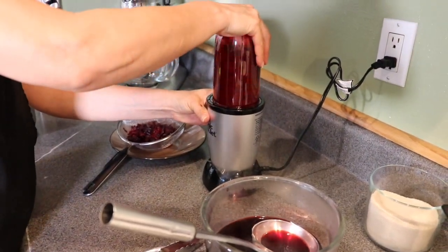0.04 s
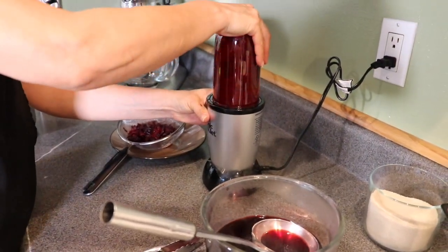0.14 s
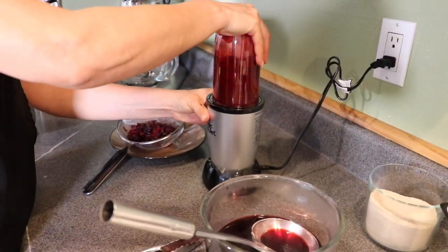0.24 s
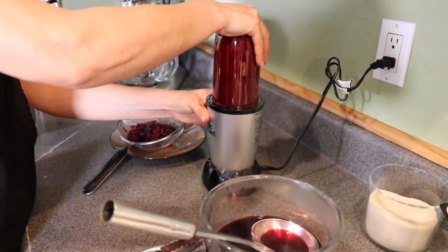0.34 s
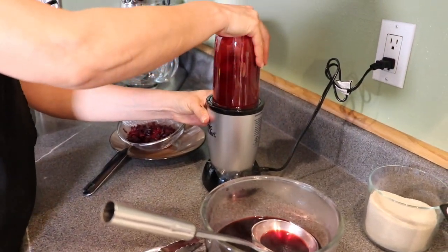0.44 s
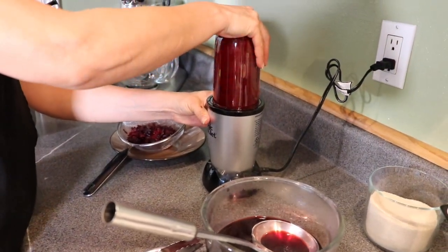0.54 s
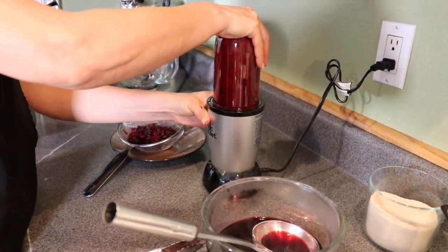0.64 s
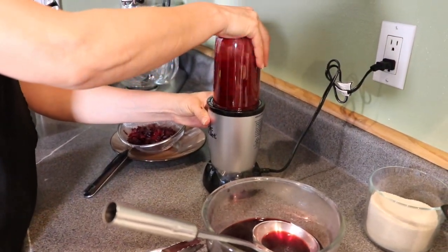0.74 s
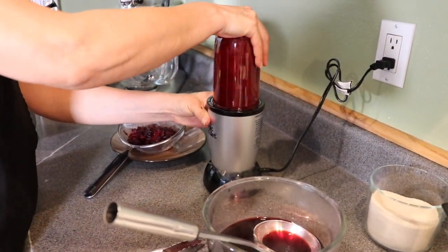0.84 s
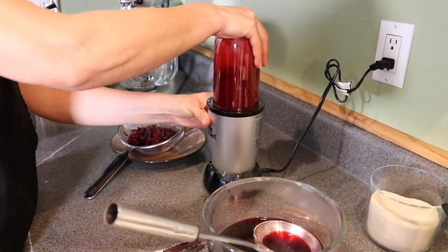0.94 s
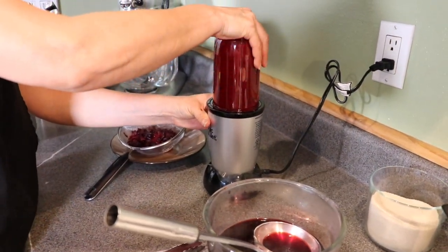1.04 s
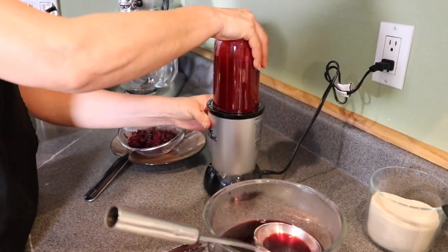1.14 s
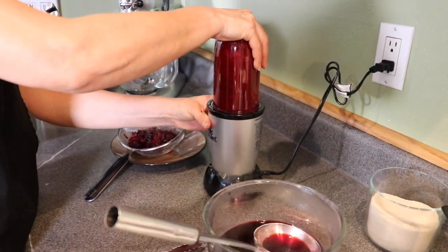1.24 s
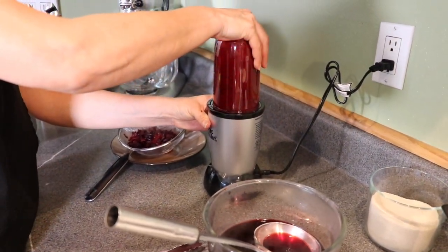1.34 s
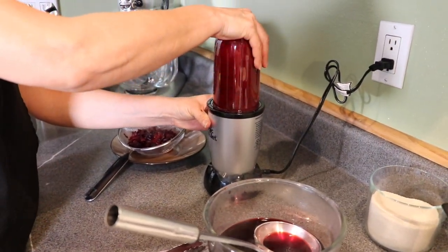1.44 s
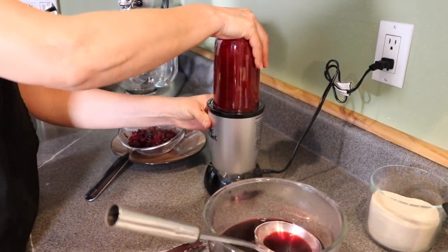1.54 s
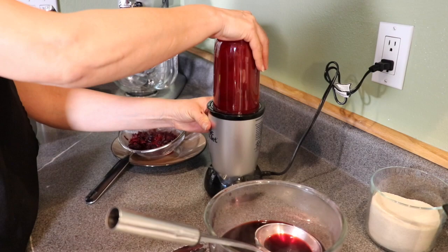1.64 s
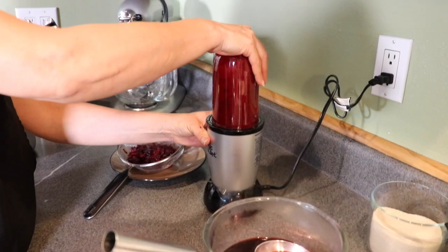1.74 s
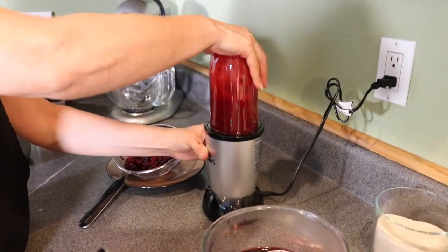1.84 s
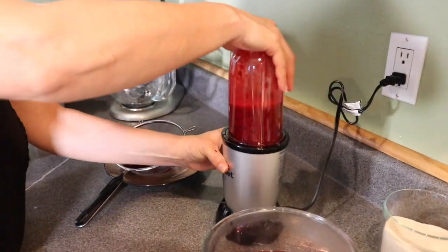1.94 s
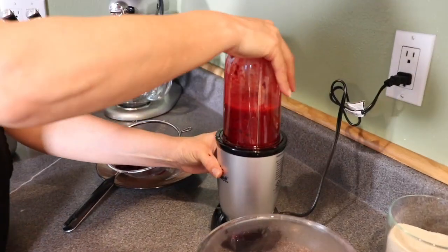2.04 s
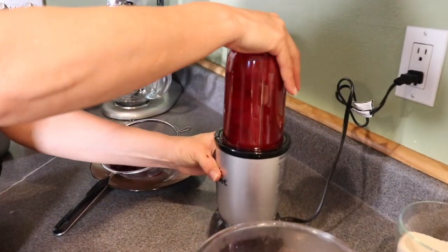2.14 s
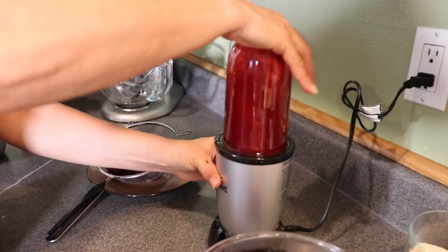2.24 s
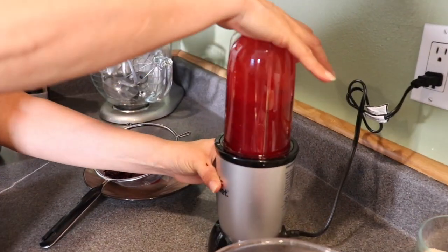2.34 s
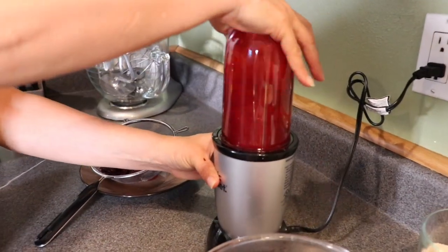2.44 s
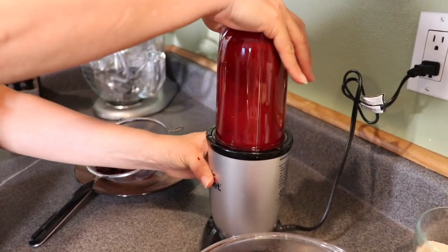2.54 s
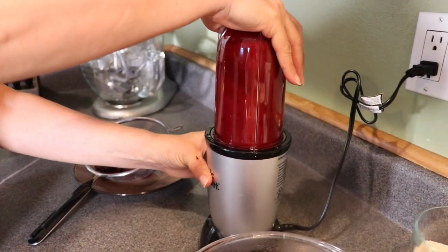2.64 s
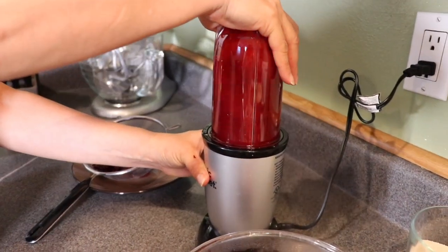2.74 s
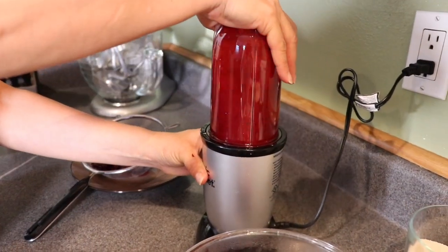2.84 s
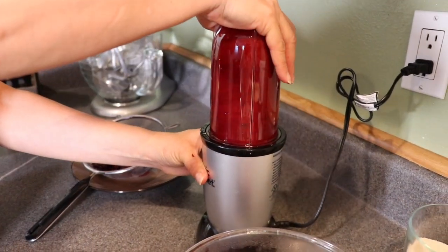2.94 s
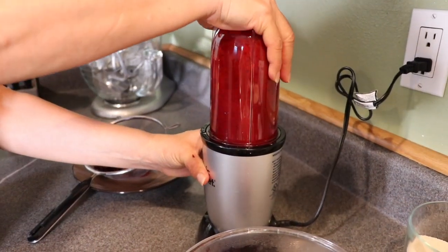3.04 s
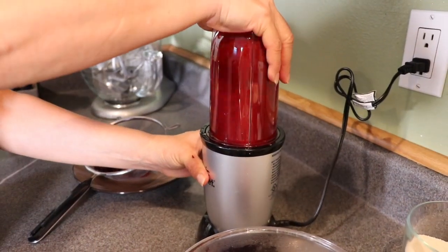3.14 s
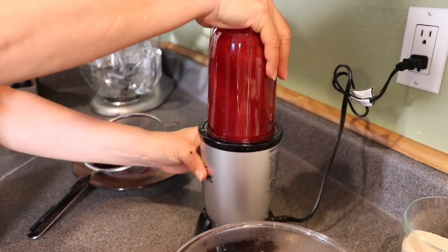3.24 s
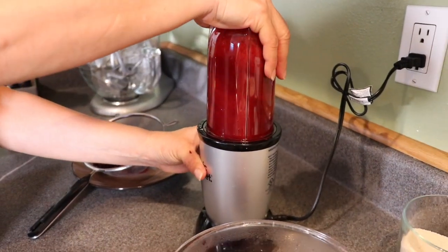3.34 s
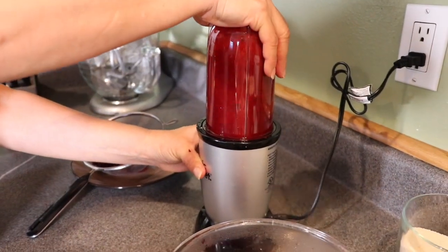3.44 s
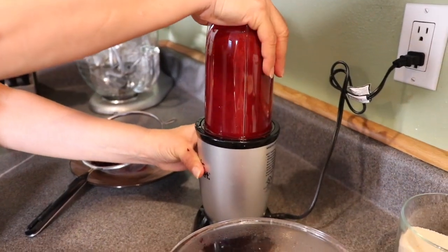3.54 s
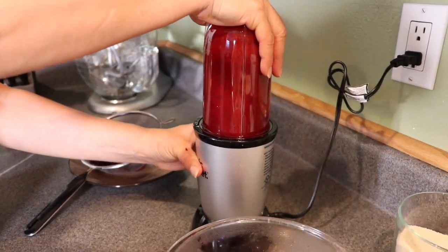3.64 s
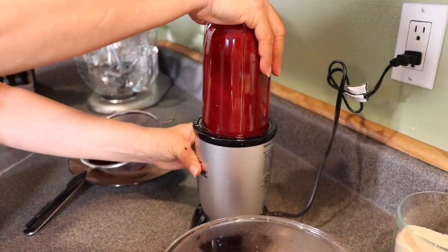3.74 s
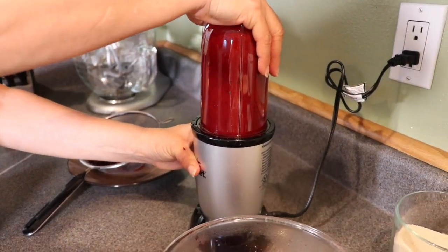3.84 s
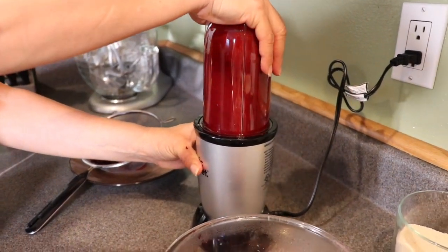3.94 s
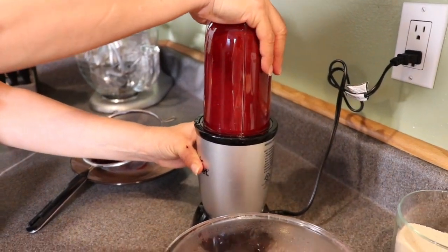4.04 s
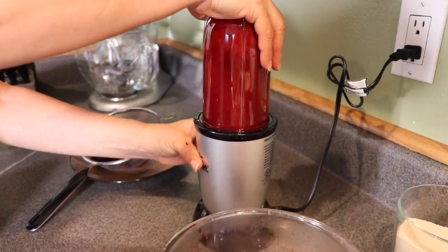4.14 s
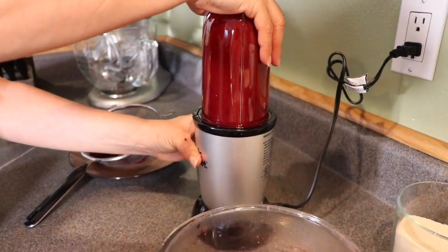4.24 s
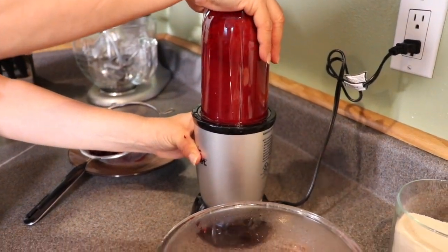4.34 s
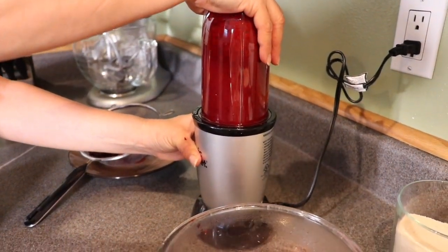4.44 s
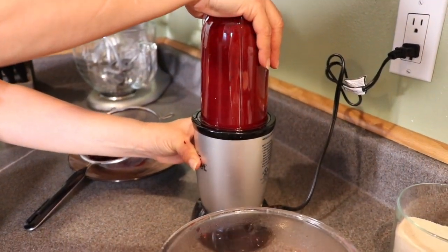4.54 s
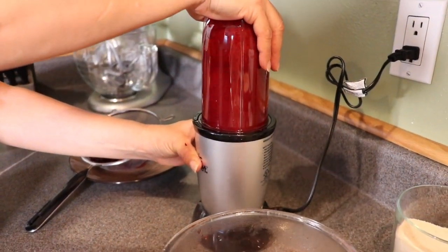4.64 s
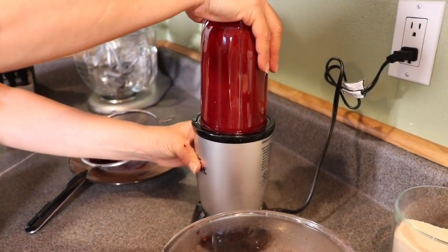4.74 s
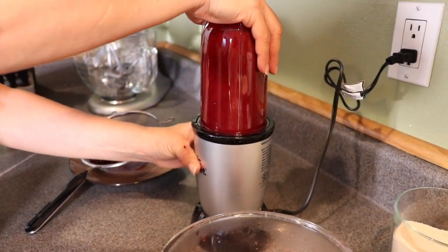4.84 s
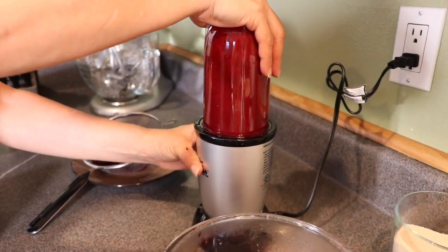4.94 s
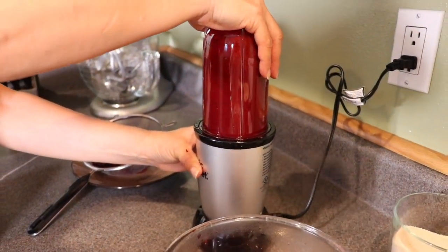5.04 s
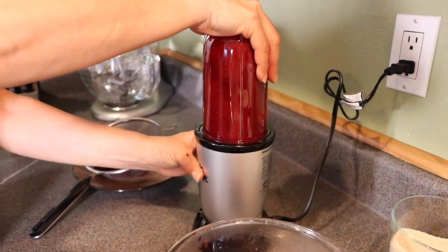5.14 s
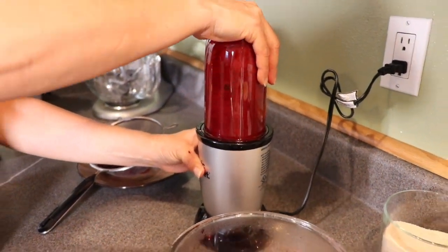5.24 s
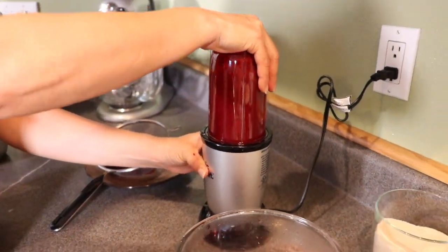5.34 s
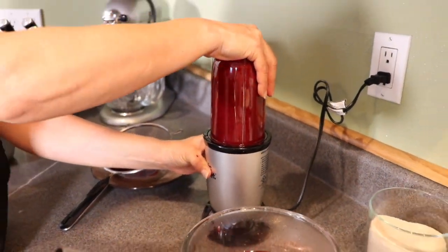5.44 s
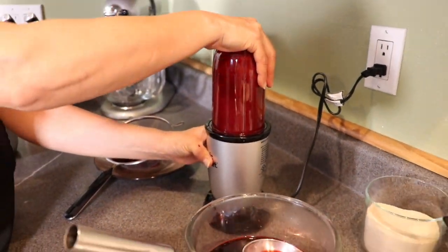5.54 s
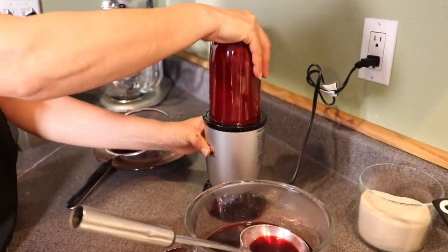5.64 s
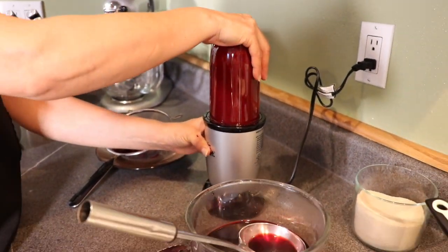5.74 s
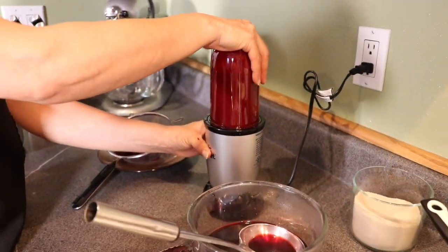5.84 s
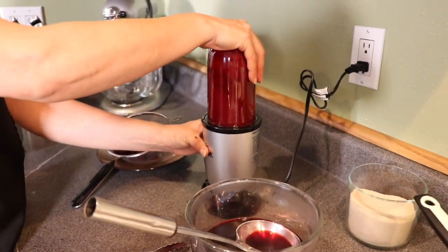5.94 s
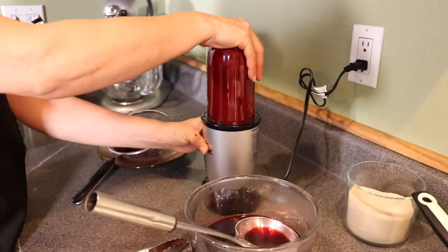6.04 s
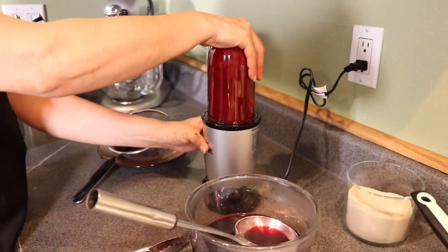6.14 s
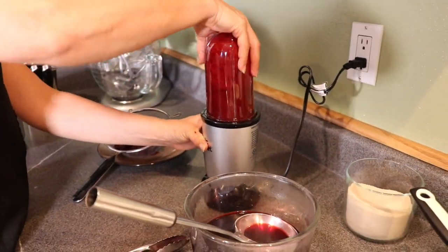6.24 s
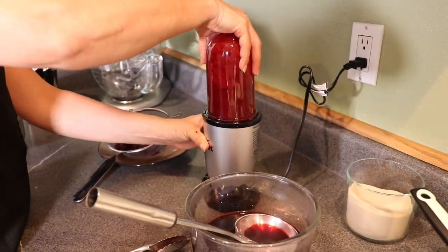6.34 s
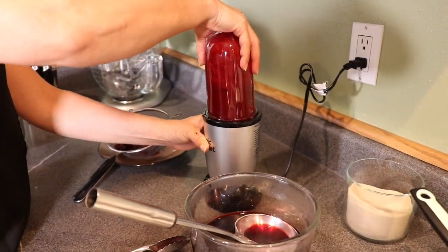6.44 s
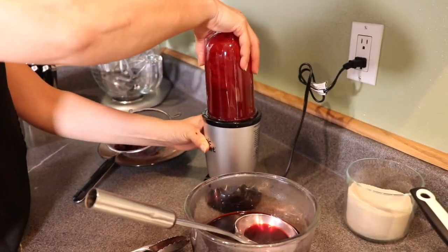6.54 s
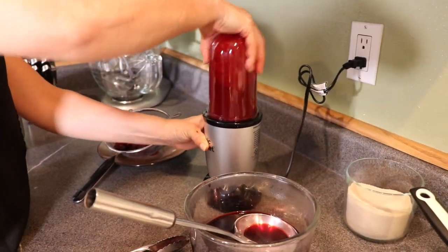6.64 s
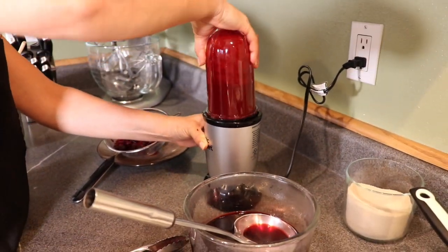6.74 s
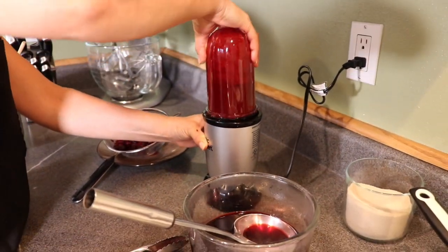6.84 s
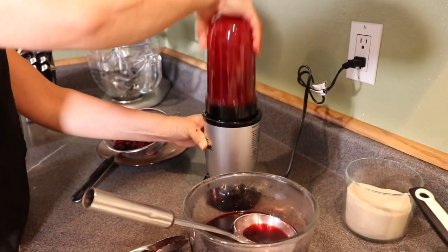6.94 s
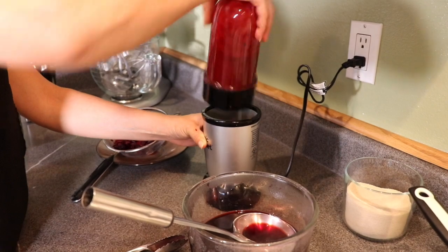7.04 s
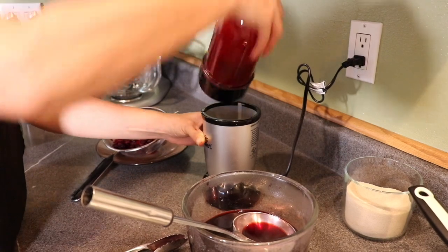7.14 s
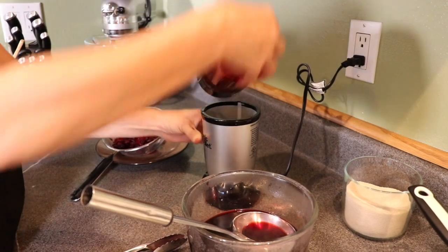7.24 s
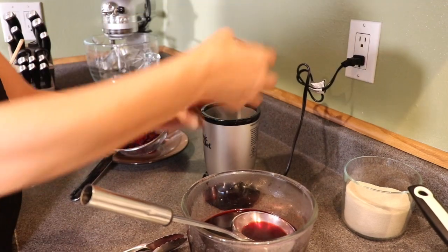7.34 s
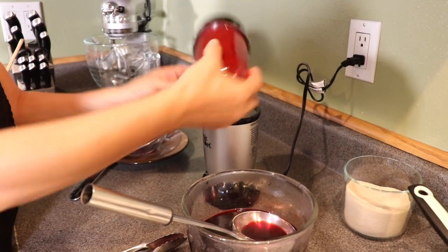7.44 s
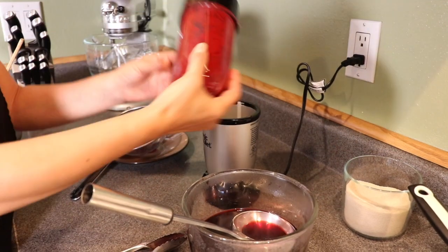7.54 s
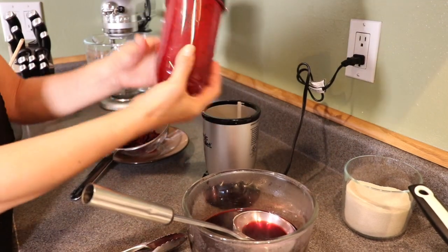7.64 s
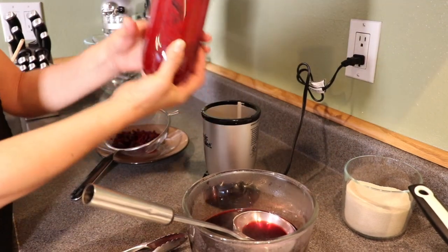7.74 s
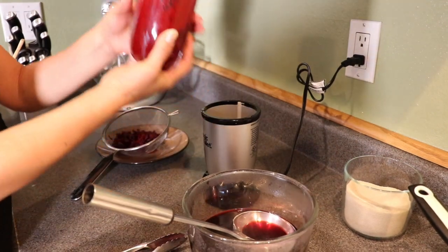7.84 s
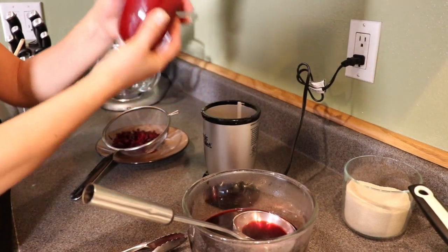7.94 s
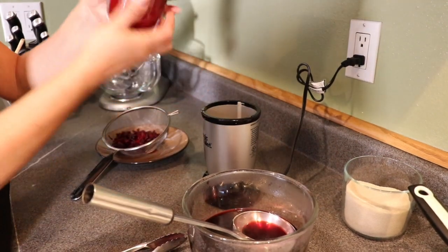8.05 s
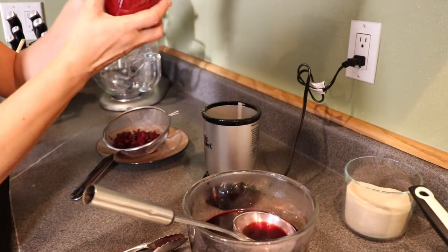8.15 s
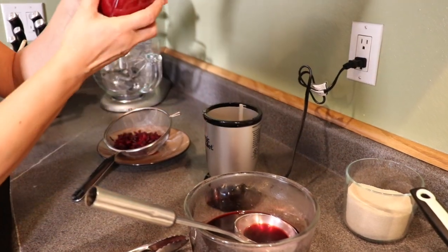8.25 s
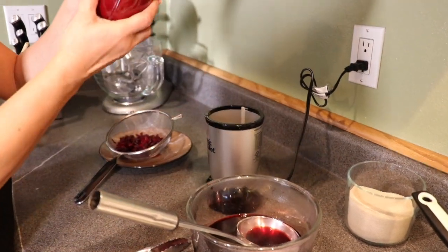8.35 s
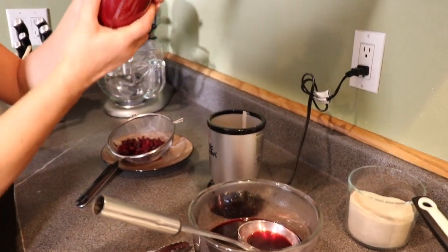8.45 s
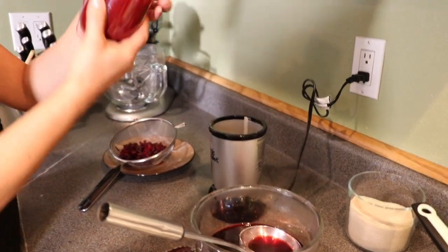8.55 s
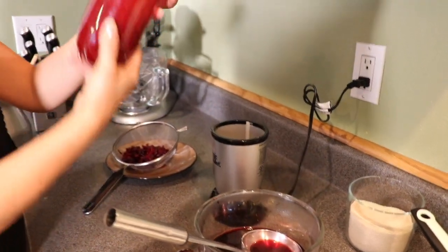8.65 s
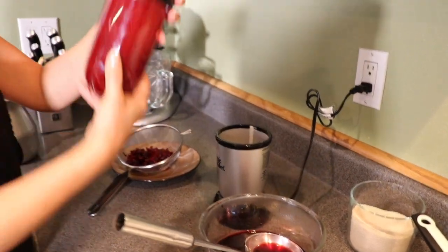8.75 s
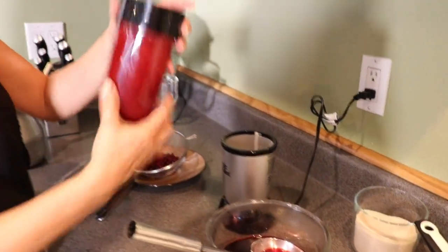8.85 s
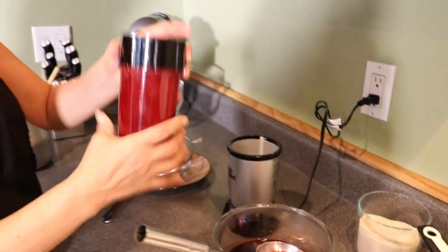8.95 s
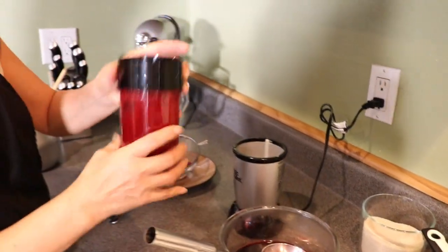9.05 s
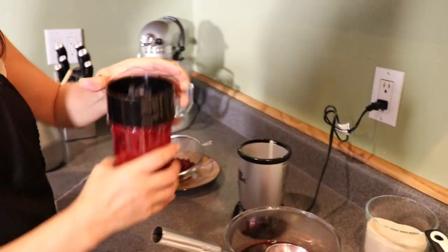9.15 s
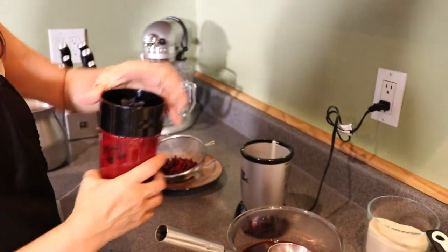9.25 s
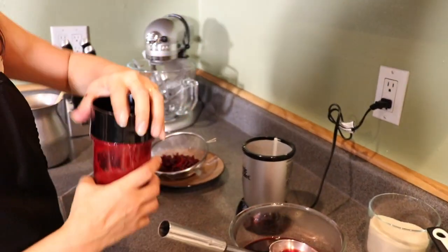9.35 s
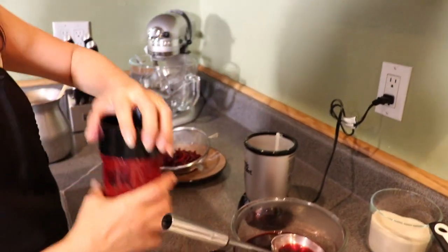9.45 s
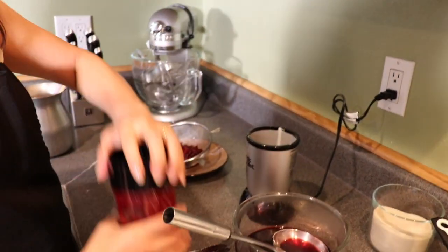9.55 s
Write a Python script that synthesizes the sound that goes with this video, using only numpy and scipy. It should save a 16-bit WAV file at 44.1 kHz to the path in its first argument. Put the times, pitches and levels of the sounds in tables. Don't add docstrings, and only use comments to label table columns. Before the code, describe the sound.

A personal blender on a counter throbs roughly four times a second, gritty and loud, then drops to a quicker, softer, fluttering grind with hard bits pinging on the cup wall. Two short pauses interrupt it. The motor stops, the cup clatters off its base, and quiet handling follows with a slight swish and a tiny pop, close stereo microphone, faint kitchen hum.

```python
import sys
import numpy as np
from scipy import signal
from scipy.fft import rfft, irfft
from scipy.io import wavfile

SR = 44100
rng = np.random.default_rng(int(sys.argv[2]) if len(sys.argv) > 2 else 0)


def dump(signal):
    limited = np.clip(np.atleast_2d(signal).T, -1, 1)
    pcm = np.round(limited * 32767).astype(np.int16)
    wavfile.write(sys.argv[1], SR, pcm)


def gain_from_decibels(decibels):
    exponent = np.asarray(decibels, float) / 20
    return 10 ** exponent


N = 422919
T = np.arange(N) / SR
HZ = np.maximum(np.fft.rfftfreq(2 ** 13, 1 / SR), 1)
LATE = slice(round(1.8 * SR), N)

# hz, alike_0_to_1
MOTOR_LIKENESS = [(60, 0.99), (300, 1), (700, 0.87), (1400, 0.65), (3000, 0.76), (6000, 0.13), (15000, 0.4)]
# hz, left_minus_right_db
MOTOR_BALANCE = [(60, -2), (200, -1), (700, -1), (1290, -1.5), (2380, -9.5), (4400, 0.5), (8120, -16.5),
                 (15000, -21.5)]
# start_s, overall_db, hands_activity_db
ROOM_LEVEL = [(1.86, -21, 0), (1.97, -30, 2), (2.03, -22, 2), (2.085, -20, -3), (5.19, -30, 0),
              (6.2, -29, -1), (6.31, -26, 10), (6.315, -4, -1.5), (6.59, -1, -2.3), (6.794, 8.5, 1),
              (6.958, 0.5, 0.7), (7.43, -1.2, 0.5), (7.9, -0.8, 0), (8.3, -1.7, -1), (8.63, 0.4, -1),
              (8.89, 2, 4), (9.17, 0.7, 4.5), (9.59, 0.5, 0.5)]


def rms_one(x):
    return x / np.sqrt(np.mean(x ** 2) + 1e-20)


def at_hz(points, hz=HZ):
    table = np.array(points)
    return np.interp(np.log(hz), np.log(table[:, 0]), table[:, 1])


def in_time(rows):
    s, *columns = np.transpose(rows)
    return [np.interp(T, s, c) for c in columns]


def by_kind(tables, kinds):
    return [(*row, *kind) for table, kind in zip(tables, kinds) for row in table]


def drift(rate):
    r = np.exp(-128 * np.pi * rate / SR)
    noise = rng.standard_normal(N // 64 + 2002)
    slow = signal.lfilter([1], [1, -2 * r, r * r], noise)[2000:]
    return np.interp(np.arange(N) / 64, np.arange(len(slow)), rms_one(slow))


def body(tone, modes):
    humps = sum(gain_from_decibels(db) ** 2 / (1 + (2 * (HZ - hz) / width) ** 2) ** 2 for hz, width, db in modes)
    return gain_from_decibels(at_hz(tone)) ** 2 + humps


def band(low_hz, high_hz):
    return 1 / (1 + (low_hz / HZ) ** 8) / (1 + (HZ / high_hz) ** 8)


def stereo(excite, power, alike, lean, lag=0):
    share, lean_gain = np.clip(at_hz(alike), 0, .99), gain_from_decibels(at_hz(lean) / 2)
    out = np.zeros(excite.shape)
    for source, sign in zip(excite, (1, -1)):
        for side, gain in enumerate((lean_gain, 1 / lean_gain)):
            cepstrum = irfft(np.log(gain * np.sqrt(power * (1 + sign * share)) + 1e-9))
            cepstrum[1:len(HZ) - 1] *= 2
            cepstrum[len(HZ):] = 0
            response = irfft(np.exp(rfft(cepstrum)))[:len(HZ)]
            out[side] += sign ** side * signal.oaconvolve(source, response)[:len(source)]
    out[0] = np.roll(out[0], lag)
    return out / np.sqrt(np.mean(((out[0] + out[1]) / 2) ** 2))


def grit(per_s, spread_db):
    struck = rng.random(N) < per_s / SR
    sizes = gain_from_decibels(spread_db * np.minimum(rng.exponential(1, N), 5)) * struck
    return rms_one(sizes) * rng.standard_normal((2, N)) + 1.57 * rng.standard_normal((2, N))


def ring(clicks, modes, luck):
    out = np.zeros(N)
    for (hz, db, t60), chance in zip(modes, luck.T):
        train = np.full(N, 1e-18)
        train[(clicks[0] * SR).astype(int)] = clicks[1] * gain_from_decibels(db + 2.8 * chance)
        r, w = gain_from_decibels(-60 / (t60 * SR)), 2 * np.pi * hz / SR
        out += signal.lfilter([0, np.sin(w)], [1, -2 * r * np.cos(w), r * r], train)
    return out


def room():
    # low_hz, high_hz, level_db, share_of_overall, share_of_hands
    layers = [(15, 138, -59, 0.95, 0.022), (169, 1310, -53, 0.87, 0), (1400, 5200, -62.5, 1, 1.1),
              (4600, 17300, -64.5, 0.95, 0.62)]
    # hz, level_db_per_hz
    room_tone = [(15, -41), (30, -10), (55, -11), (146, -14.5), (250, -10.5), (420, -9.5), (610, -14.5),
                 (1320, -17.5), (3000, -22), (4200, -27), (5000, -32.5), (6200, -28.5), (9000, -29.5),
                 (15600, -37.5)]
    # hz, width_hz, level_db
    room_modes = [(243.6, 39, -4.5), (242, 9.9, -9), (351, 38, -4.5), (418, 10.3, -9), (620, 14, -6.5),
                  (1215, 80, -14)]
    # hz, alike_0_to_1
    likeness = [(60, 0.7), (130, 0.47), (290, 0.89), (640, 0.56), (1410, 0.28), (3100, 0), (6820, 0.05),
                (15000, 0.1)]
    # hz, left_minus_right_db
    balance = [(60, -1), (240, 0.5), (950, -1), (3770, -1.5), (15000, -4)]
    overall_db, hands_db = in_time(ROOM_LEVEL)
    swish_s, swish_width_s, swish_peak_db = 7.97, 0.33, 5.5
    swish_db = swish_peak_db * np.exp(-((T - swish_s) / swish_width_s) ** 2)
    out = np.zeros((2, N))
    for low, high, db, overall, hands in layers:
        power = body(room_tone, room_modes) * band(low, high)
        noise = stereo(rng.standard_normal(out[:, LATE].shape), power, likeness, balance)
        level_db = db + overall * overall_db + hands * hands_db + drift(15)
        level_db = level_db + swish_db * (low > 4000)
        out[:, LATE] += noise * gain_from_decibels(level_db)[LATE]
    return out


def hum():
    level_db = in_time(ROOM_LEVEL)[0] - 200 * (T <= 1.8)
    out = np.zeros(N)
    for hz, db in ((415.0, -58.0), (240.6, -59.5)):
        loudness = gain_from_decibels(level_db + db + 1.9 * drift(7.7))
        out += loudness * np.sin(2 * np.pi * hz * T + 0.54 * drift(2.7))
    return out


def pop():
    pop_s, width_s, level_db = 8.617, .00035, -28
    u = (T - pop_s) / width_s
    return gain_from_decibels(level_db) * u * np.exp(-u ** 2 / 2) * gain_from_decibels(np.array([[4], [-8]]))


def thuds():
    # start_s, level_db, pitch_hz
    jolts = [(.0, -36.5, 100), (.224, -28.5, 96), (.496, -34, 100), (.729, -31.5, 100), (.982, -44, 100),
             (1.198, -41.5, 122), (1.409, -32.5, 107)]
    # start_s, level_db, pitch_hz
    taps = [(1.918, -44, 126), (1.934, -52, 124), (1.972, -51, 121), (1.986, -54, 119), (2.024, -50, 118),
            (2.038, -53, 116), (6.98, -28, 105), (6.9895, -29.5, 105)]
    # start_s, level_db, pitch_hz
    drops = [(5.269, -51, 60.5), (6.405, -39, 102), (6.42, -40, 49.7), (6.63, -17.5, 100),
             (6.677, -18, 86.6), (6.741, -32, 104), (6.98, -32, 105), (7.099, -37, 86), (7.139, -34, 86)]
    # start_s, level_db, pitch_hz
    grips = [(8.46, -51, 88.5), (8.615, -32.5, 64), (8.617, -45, 111), (8.742, -40, 69)]
    # rise_s, t60_s, pan_db
    thud_kinds = [
        (0.019, 0.22, -2.5),
        (0.0097, 0.045, -3),
        (0.016, 0.27, -2),
        (0.0052, 0.12, 19.5),
    ]
    out = np.zeros((2, N))
    for at, db, hz, rise, t60, pan_db in by_kind((jolts, taps, drops, grips), thud_kinds):
        span = slice(int(at * SR), int(at * SR) + SR // 2)
        since = T[span] - at
        swell = np.sin(np.pi / 2 * np.clip(since / max(rise, .001), 0, 1)) ** 2
        fade = gain_from_decibels(db - 2.5 - 60 * (np.maximum(since - rise, 0) / t60) ** 0.83)
        wave = np.sin(2 * np.pi * hz * (since + 0.0039 * (1 - np.exp(-since / 0.025))))
        out[:, span] += swell * fade * wave * gain_from_decibels(np.array([[pan_db], [-pan_db]]) / 2)
    return out


def knocks():
    # start_s, peak_db, ping_hz
    ticks = [(1.925, -41.5, 2380), (1.974, -52, 2900), (1.986, -50.5, 3460), (6.594, -27, 2110),
             (6.626, -11.5, 3020), (6.632, -22, 1700), (6.693, -14, 2950), (6.6465, -10.5, 2310),
             (6.971, -32, 2230), (6.977, -27.5, 2230), (6.988, -35, 3300)]
    # start_s, peak_db, ping_hz
    cup_pings = [(6.402, -40, 1780), (7.139, -43, 1810), (7.911, -43, 2030), (9.136, -36, 1950)]
    # start_s, peak_db, ping_hz
    bumps = [(6.616, -26.5, 1900), (6.646, -6.5, 2410), (6.657, -14.5, 1070), (6.75, -20.5, 2170),
             (7.119, -37, 2370), (9.166, -39.5, 1430)]
    # start_s, peak_db, ping_hz
    scuffs = [(1.873, -44.5, 4270), (1.886, -53, 1800), (5.22, -68, 1770), (6.253, -51, 3800),
              (6.668, -32, 1900), (6.708, -27, 2500), (6.727, -24, 2790), (6.775, -35, 1790),
              (6.815, -34.5, 3550), (7.084, -32.5, 3990), (7.104, -36.5, 2400), (7.127, -41, 3600),
              (9.15, -41, 3500), (7.94, -42.5, 1570)]
    # start_s, peak_db, ping_hz
    thumps = [(6.656, -39, 1450), (6.674, -28, 1100), (6.707, -29, 1270), (6.698, -24, 1000),
              (6.72, -30, 750), (6.737, -25, 800), (6.757, -30, 1250), (7.157, -43, 2310)]
    # body_db, sharp_part_db, length_s, ping_db
    knock_kinds = [
        (-10.5, -20.5, 0.033, -7),
        (-22, -15, 0.04, -1),
        (-4.5, -20, 0.034, -3.5),
        (-12, -6.5, 0.032, -6),
        (3.5, -30, 0.049, -13),
    ]
    # hz, level_db, t60_s
    cup_modes = [(895, 3, 0.041), (1000, -18, 0.039), (1780, -7, 0.076), (2230, 4, 0.038),
                 (2360, -15, 0.013), (3110, -24, 0.021), (3300, 7, 0.033), (3970, -2, .03),
                 (6070, -4.5, .03), (6950, -38, .03)]
    # hz, level_db, t60_s
    counter_modes = [(270.4, -3, 0.18), (338, -7.5, 0.24), (379, -10, 0.48), (483.6, -12, 0.36),
                     (714, -12, 0.033)]
    events = by_kind((ticks, cup_pings, bumps, scuffs, thumps), knock_kinds)
    s, db, ping_hz, body_db, sharp_db, length, ping_db = np.transpose(events)
    luck = rng.standard_normal((len(s), len(cup_modes) + len(counter_modes)))
    hit = ring((s, gain_from_decibels(db - 20.0)), cup_modes, luck)
    hit += ring((s, gain_from_decibels(db + body_db - 9)), counter_modes, luck[:, len(cup_modes):])
    hit = signal.sosfilt(signal.butter(2, 5200, fs=SR, output="sos"), hit)

    crack_share = .7
    boom, scatter, scratch = np.zeros((3, N))
    lengths = np.maximum(length, .005)
    for at, level_db, low_db, hz, high_db, fade, tone_db in zip(
            s, db, body_db, ping_hz, sharp_db, lengths, ping_db):
        span = slice(int(at * SR), int(at * SR) + SR // 3)
        since = T[span] - at
        shape = gain_from_decibels(level_db - 60 * since / (2.8 * fade)) * np.clip(since / 0.0019, 0, 1)
        boom[span] += shape * gain_from_decibels(low_db - 8.0)
        scatter[span] += shape * gain_from_decibels(-14.5 - 60 * since / (2.7 * fade) * (1 / crack_share - 1))
        scratch[span] += shape * gain_from_decibels(high_db - 4.5)
        hit[span] += shape * gain_from_decibels(tone_db - 60 * since / 0.044) * np.sin(2 * np.pi * hz * since)

    contacts = grit(1500, spread_db=2.0)
    tone = body([(120, -20), (230, -8), (350, 5.0), (700, -6.0), (2400, -4.0), (4000, -6),
                 (5000, -13.5), (7000, -17.5), (11000, -24.5), (15500, -40.5)], [])
    out = np.array([np.roll(hit, 3), hit]) * gain_from_decibels(np.array([[-2], [2.2]]))
    for envelope, edges in ((boom, (100, 750)), (scatter, (750, 4600)), (scratch, (4600, 16000))):
        noise = stereo(contacts[:, LATE], tone * band(*edges), MOTOR_LIKENESS, MOTOR_BALANCE, lag=2)
        out[:, LATE] += envelope[LATE] * noise
    return out


def kitchen(x, t60=0.19, wet_db=-16):
    since = np.arange(SR // 2) / SR
    tail = rng.standard_normal((2, len(since))) * gain_from_decibels(-60 * since / t60) * (since > .004)
    tail = signal.lfilter([.5], [1, -.5], tail)
    tail = tail / np.sqrt(np.sum(tail[0] ** 2))
    return x + gain_from_decibels(wet_db) * signal.oaconvolve(x, tail, axes=1)[:, :N]


def wall(s, db):
    # hz, level_db, t60_s
    wall_modes = [(1950, -13.5, 0.041), (2284, -8, 0.015), (2830, -13, 0.031), (3250, -1, 0.008),
                  (3720, -4, 0.013)]
    rings = ring((s, gain_from_decibels(db)), wall_modes, rng.standard_normal((len(s), len(wall_modes))))
    soft = signal.sosfilt(signal.butter(2, [1700, 4200], "band", fs=SR, output="sos"), rings)
    sides = np.array([np.roll(soft, 3), 0.92 * soft + .5 * np.roll(soft, 29)])
    return sides * gain_from_decibels(np.array([[-2.5], [2.5]]))


def chips():
    # start_s, peak_db, ping_hz
    hard_chips = [(0.033, -14, 2890), (0.0867, -28, 3110), (0.1131, -13, 3250), (0.176, -20, 2880),
                  (0.2084, -28, 2250), (0.208, -15, 2890), (0.262, -20, 3110), (0.3651, -19.5, 3390),
                  (0.3848, -14, 2870), (0.4394, -14.5, 3210), (0.4614, -16.5, 3340), (0.5097, -18, 3260),
                  (0.5372, -19, 2150), (0.605, -25, 2800), (0.6257, -24, 1900), (0.6682, -20, 3270),
                  (0.6844, -19, 2210), (0.7726, -20, 3300), (0.816, -22.5, 3280), (0.8669, -27, 3250),
                  (0.9168, -16.5, 2830), (0.9358, -17, 3250), (0.97, -12.5, 3410), (1.013, -22, 2880),
                  (1.0335, -18.5, 3170), (1.1273, -21, 2890), (1.1643, -12, 2140), (1.1774, -14.5, 2150),
                  (1.242, -18, 3250), (1.3145, -20, 3280), (1.3623, -18, 2030), (1.373, -17, 2260),
                  (1.3874, -28, 3360), (1.4491, -23, 3240), (1.5199, -28.5, 1730), (1.5464, -26, 3260),
                  (1.5648, -12.5, 2120), (1.5704, -18, 2170), (1.5913, -30, 2130), (1.644, -24.5, 2910),
                  (1.6924, -32, 3170), (1.7514, -31, 3380), (1.7714, -36, 3370), (1.7998, -35, 3180),
                  (2.2685, -30, 3050), (2.3234, -34, 2160), (2.3643, -30, 2020), (2.4301, -31, 2020),
                  (2.4735, -37, 3010), (2.5275, -27, 2830), (2.5898, -27, 2150), (2.6526, -28, 1970),
                  (2.7704, -26, 2130), (2.8217, -29, 3100), (2.8661, -34, 2130), (3.0268, -32, 2000),
                  (3.2059, -29, 2150), (3.4194, -32, 2860), (3.4927, -34, 2080), (3.809, -36, 1930),
                  (4.01, -29, 2000), (4.226, -29, 1890), (4.3029, -34, 3280), (4.4545, -25, 3260),
                  (4.5304, -33, 1940), (4.5947, -36, 2160), (4.6606, -36, 2880), (5.1125, -33, 3120),
                  (5.2223, -66, 3850), (5.2702, -47, 2130), (5.2765, -40, 2480), (5.572, -36, 3140),
                  (5.6473, -30, 2200), (5.8728, -31, 2220), (5.9531, -35, 3240), (6.0306, -28, 2950),
                  (6.1028, -30, 3260)]
    ping_t60_s, chip_ping_db, chip_wall_db = .03, -6, -7
    s, db, ping_hz = np.transpose(hard_chips)
    pings, since = np.zeros(N), T[:SR // 20]
    for at, level_db, hz in zip(s, db, ping_hz):
        fade = gain_from_decibels(level_db + chip_ping_db - 60 * since / ping_t60_s)
        shape = fade * np.clip(since / 0.00098, 0, 1)
        pings[int(at * SR):][:len(since)] += shape * np.sin(2 * np.pi * hz * since)
    sides = np.array([np.roll(pings, 3), pings]) * gain_from_decibels(np.array([[-3], [2.5]]))
    return wall(s, db + chip_wall_db) + sides


def wander(x, drifts):
    # low_hz, high_hz
    zones = [(1150, 1230), (1800, 2150), (2650, 3200), (3100, 4200)]
    out = x.copy()
    for zone, chance in zip(zones, drifts):
        b, a = signal.butter(1, zone, "band", fs=SR)
        out += signal.lfilter(b, a, x) * (gain_from_decibels(2.2 * chance) - 1)
    return out


def sag(dip_db, cycle, late):
    crest_sharpness = 0.76
    swirl = 2 * np.pi * cycle + 0.033 * (np.cos(2 * np.pi * cycle) - 1)
    return dip_db * np.abs(np.sin(swirl / 2 - np.pi * late)) ** (2 * crest_sharpness)


def blender():
    # start_s, switched_off_s, cut_s, lag_of_lows_turns, rumble_db
    runs = [
        (0, 1.576, 1.576, 0.13, -57),
        (1.581, 1.8, 1.847, .11, -65.5),
        (2.096, 5.117, 5.2, 0.13, -63.5),
        (5.273, 6.122, 6.2, 0.21, -62.5),
    ]
    # start_s, turns_made, crest_rattle_db, dip_db, growl_db
    swirl_slow = [(0.0, 0.5, -27, 8, -35.5), (.215, 1, -27.5, 7, -34.5), (.462, 2, -26, 9, -34),
                  (.705, 3, -26.5, 9.5, -32.5), (.945, 4, -27.5, 7.5, -32.5), (1.172, 5, -27.5, 7.5, -33),
                  (1.378, 6, -29, 8.5, -33.5), (1.575, 7, -28.5, 6, -33)]
    # start_s, turns_made, crest_rattle_db, dip_db, growl_db
    swirl_burst = [(1.542, 0, -43.5, 3, -50.5), (1.699, 3, -39.5, 9, -44.5), (1.802, 5, -44.5, 5, -47),
                   (1.845, 11, -45, 0.0, -50.5)]
    # start_s, turns_made, crest_rattle_db, dip_db, growl_db
    swirl_long = [(2.112, 0, -38, 7, -42), (2.589, 9, -39, 7.5, -44.5), (2.661, 10, -39, 7.5, -44),
                  (2.874, 14, -40, 6.5, -47.5), (2.943, 15, -39.5, 6.5, -47.5),
                  (3.137, 18, -41, 6.5, -47.5), (3.215, 19, -40, 6.5, -47), (3.35, 21, -41.5, 6, -47),
                  (3.429, 22, -40.5, 6.5, -47), (3.562, 24, -39, 6.5, -44.5), (3.955, 30, -39.5, 8, -44.5),
                  (4.312, 35, -39.5, 8.5, -44.5), (4.392, 36, -39, 8.5, -44.5),
                  (4.673, 40, -39, 8.5, -44.5), (4.755, 41, -38.5, 8.5, -45), (4.982, 44, -38.5, 8, -45),
                  (5.125, 46, -41, 3, -45.5)]
    # start_s, turns_made, crest_rattle_db, dip_db, growl_db
    swirl_last = [(5.27, -0.5, -37, 2.8, -43), (5.502, 3, -39, 6.9, -46), (6.123, 11, -39.5, 8, -45.5)]
    # hz, width_hz, level_db
    thin_modes = [(280, 13, -8), (344.3, 26, 5), (399, 50, 2), (494.4, 34, 2.5), (758, 50, -2),
                  (862.3, 37, 4), (1390, 170, -13.5), (2130, 140, -6.5), (2880, 57, -5), (3350, 500, -8),
                  (5880, 710, -22.5), (7180, 1600, -29)]
    # hz, width_hz, level_db
    thick_modes = [(240, 72, -4.5), (337, 46, 3), (390, 102, 3), (502, 31, -3.5), (769, 134, -4),
                   (2160, 107, -6.5), (2950, 530, -13), (3260, 160, -11.5), (5670, 130, -18),
                   (6250, 530, -24.5), (7170, 1100, -26)]
    # hz, level_db
    growl_tone = [(25, -42.5), (60, -20.5), (170, -19), (260, -9), (520, -8.5), (1000, -6), (1300, -11),
                  (2500, -46.5)]
    # hz, level_db
    rattle_tone = [(500, -34), (900, -20), (1300, -10), (2500, -14), (3700, -13.5), (4700, -21.5),
                   (8000, -31.5), (12000, -40), (15500, -48)]
    start_db_per_s, first_turn_loss_db, uneven_spread_db = 2401, 7, 0.67
    coast_db_per_s = (522, 314, 138)
    flutter_db = (1.4, .6, .6, .6)
    rumble_follows = 2.2

    out = np.zeros((2, N))
    rough, smooth = grit(1800, spread_db=2.2), grit(900, spread_db=3.0)
    flutter, drifts = drift(40), np.array([drift(14) for _ in range(5)])
    bits = rng.random((900, 2))
    patter = rms_one(wall(bits[:, 0] * runs[-1][1], -12 * bits[:, 1])[:, :round(6.4 * SR)])
    rumble_power = body([(25, -18), (50, -22.5), (70, -25.5), (170, -10.5), (400, -73.5)], [(100, 83, 0.01)])
    swirls = (swirl_slow, swirl_burst, swirl_long, swirl_last)
    for k, (rows, (start, off, cut, lag, rumble_db)) in enumerate(zip(swirls, runs)):
        s, turns, crest_db, dip_db, growl_db = np.transpose(rows)
        turns = np.round(2 * turns) / 2
        span = slice(max(round((start - .04) * SR), 0), round((cut + .04) * SR))
        t, modes = T[span], thin_modes if k < 2 else thick_modes

        growl_power = body(growl_tone, modes)
        rattle, whirr, growl, rumble = [
            stereo(source[:, span], power, MOTOR_LIKENESS, MOTOR_BALANCE, lag=2) for source, power in (
                (rough, body(rattle_tone, modes) * band(968, 15000)),
                (smooth, growl_power * band(643, 1080)),
                (smooth, growl_power * band(10, 575)),
                (smooth[::-1], rumble_power))]

        cycle = np.interp(t, s, turns)
        uneven = uneven_spread_db * np.interp(cycle, np.arange(50), rng.standard_normal(50))
        dip = np.maximum(np.interp(np.floor(cycle), turns, dip_db), 0) * (cycle >= 1) * (t < off)
        crest_sag = sag(dip, cycle, 0)

        on_db = -start_db_per_s * np.maximum(start - t, 0) - 6000 * np.maximum(t - cut, 0)
        rattle_on, growl_on, rumble_on = on_db - np.outer(coast_db_per_s, np.maximum(t - off, 0))
        first = first_turn_loss_db * np.clip(1 - cycle, 0, 1)
        rattle_db = np.interp(t, s, crest_db) - first + uneven - crest_sag + flutter_db[k] * flutter[span]
        motor_db = np.interp(t, s, growl_db)
        whirr_db = motor_db - 2.0 + .8 * drifts[-1, span] - 0.42 * sag(dip, cycle, .02)
        shake_db = rumble_db + rumble_follows * (motor_db - motor_db.mean())

        grinding = wander(rattle, drifts[:, span]) + .3 * gain_from_decibels(-.5 * crest_sag) * patter[:, span]
        out[:, span] += grinding * gain_from_decibels(rattle_on + rattle_db - 1)
        out[:, span] += whirr * gain_from_decibels(growl_on + whirr_db)
        out[:, span] += growl * gain_from_decibels(growl_on + motor_db - 0.75 - 0.67 * sag(dip, cycle, lag))
        out[:, span] += rumble * gain_from_decibels(rumble_on + shake_db + 8 - 1.13 * sag(dip, cycle, lag + .05))
    return out


def scene():
    return room() + hum() + pop() + thuds() + kitchen(knocks()) + chips() + blender()


def low_pass(x):
    return signal.sosfilt(signal.butter(12, 15735, fs=SR, output="sos"), x)


def record(dry):
    top = signal.cheby2(16, 60, 15900, fs=SR, output="sos")
    rounded = 0.92 * np.tanh(dry / 0.88)
    return low_pass(signal.sosfilt(top, rounded))


dry = scene()
out = record(dry)
dump(out)
```